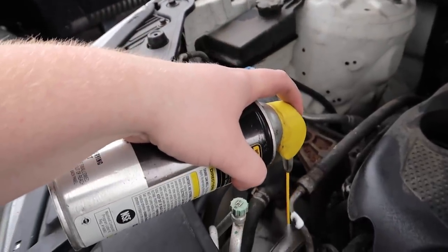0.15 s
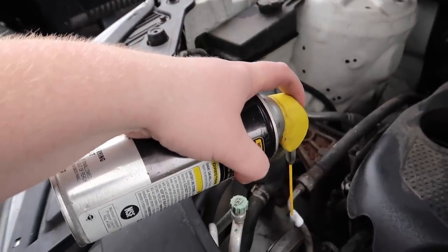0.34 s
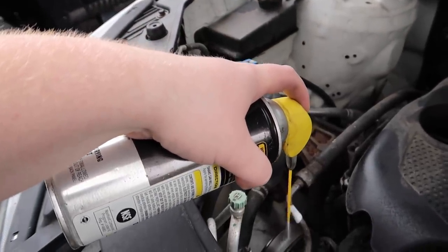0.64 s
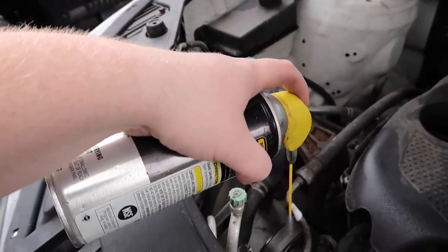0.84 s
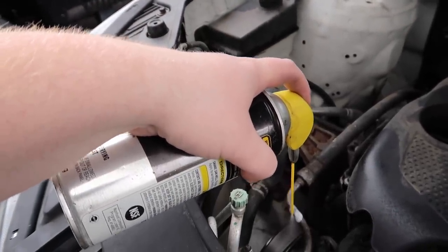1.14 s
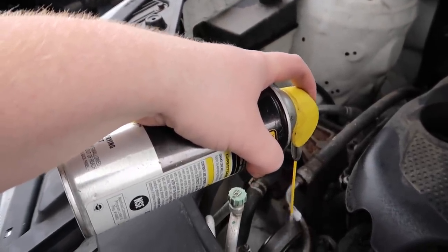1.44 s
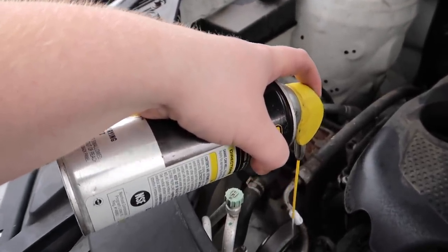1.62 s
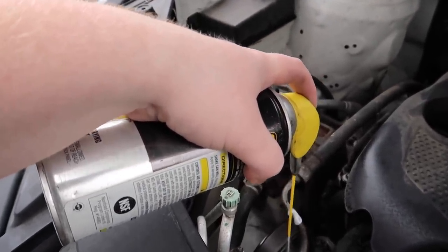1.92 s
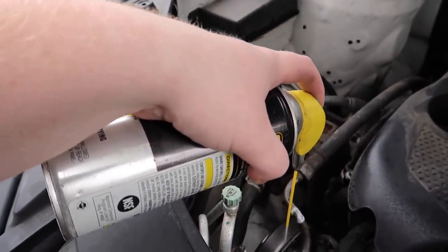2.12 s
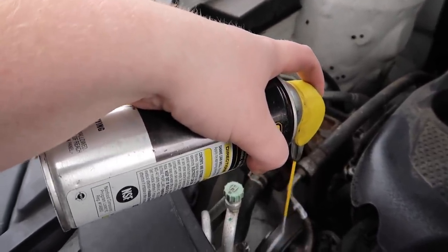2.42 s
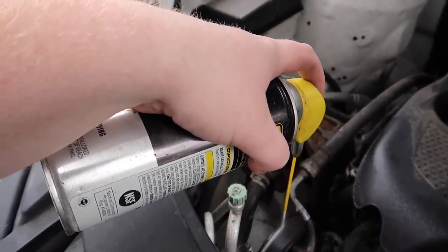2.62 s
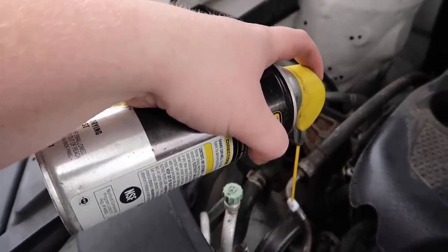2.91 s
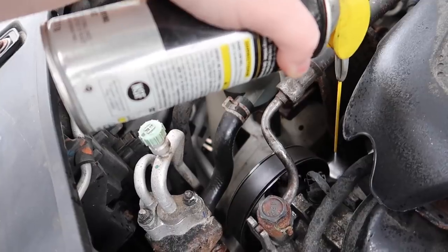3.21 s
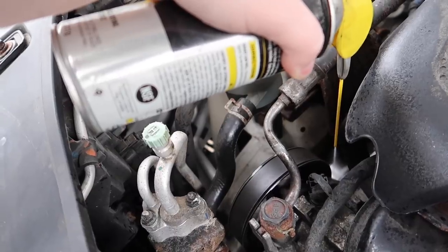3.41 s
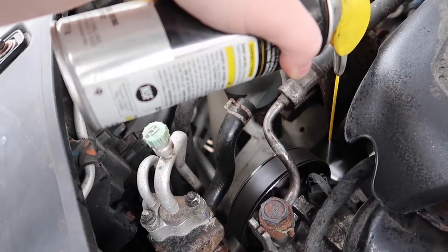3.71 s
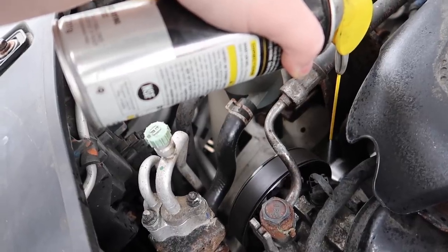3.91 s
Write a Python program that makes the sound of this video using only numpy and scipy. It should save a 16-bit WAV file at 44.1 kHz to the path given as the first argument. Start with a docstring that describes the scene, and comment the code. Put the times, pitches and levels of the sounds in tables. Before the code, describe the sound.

A loud, shrill belt squeal dominates, trilling rapidly with raspy side tones and rubbing rubber hiss. It begins somewhat softer, rises by one second and continues to the cut. An aerosol jet and a dull engine idle sit far below. After three seconds the pitch jumps and the spray and engine edge forward. Close, fairly dry stereo in an engine compartment, with very short bright reflections and low air thumps.

```python
"""A harsh two-tone belt squeal, pulsing twice per pulley turn, under a hissing aerosol can in an idling engine bay.
Belt: two stick-slip tones, split into side tones by the flutter of the span, plus the hiss of rubbing rubber.
Spray: patchy shaped noise, slightly weaker while the belt grips. Engine: throbbing low noise and unsteady orders.
Fan wind puffs on two microphone ports; short treble echoes follow the squeal."""
import sys
import numpy as np
from scipy import signal
from scipy.fft import rfft, irfft, next_fast_len
from scipy.io import wavfile
from scipy.ndimage import uniform_filter1d, map_coordinates

SR = 44100
rng = np.random.default_rng(int(sys.argv[2]) if len(sys.argv) > 2 else 0)


def dump_mix(stems):
    """Bounce the given channels to the path in sys.argv[1] as a 16-bit WAV at rate SR."""
    frames = np.atleast_2d(stems).T  # one column per channel
    limited = np.clip(frames, -1, 1)  # hard clip at full scale
    pcm = np.round(limited * 32767).astype(np.int16)
    wavfile.write(sys.argv[1], SR, pcm)


N = 178649

# Side tones above the low tone: step_flutters, level_db (relative to upper_db)
SIDE_TONES = [(2, -0.5), (3, -2.5), (4, -11.5), (5, -17.5), (6, -14.5), (7, -14), (8, -26), (9, -22)]
# Side tones below the high tone: step_flutters, level_db (relative to the mean dB of both tones)
UNDER_TONES = [(-2, -12.5), (-3, -21.5), (-4, -32)]
# Wet belt's low tone drops flat and climbs back: centre_s, depth_hz
SWOOPS = [(3.715, 110), (3.878, 330), (3.955, 190), (4.03, 170)]
SWOOP_FALL_S, SWOOP_CLIMB_S = 0.01194, 0.026


def belt():
    """Stick-slip tones; the span's flutter is heard itself and steps side tones off them."""
    held, place, dip = slips(glide_s=0.0058, early_s=0.0039)
    low_hz, low_db, high_hz, high_db, flutter_hz, flutter_db, octave_db, upper_db = held
    grip_db = dip(0.011, 0.007)
    late_db = dip(0.015, 0.016, widens=0.2)  # side tones need longer to build up again

    swoop_s, swoop_hz = np.transpose(SWOOPS)
    since_s = np.arange(N) / SR - swoop_s[:, None]
    swoop_width_s = np.where(since_s < 0, SWOOP_FALL_S, SWOOP_CLIMB_S)
    low_hz = low_hz - swoop_hz @ np.exp(-(since_s / swoop_width_s) ** 2)

    # tension builds in a slip, sags in the grip
    tension = 1 + 0.01 * (place - 0.5) + 0.0024 * (grip_db + 1.5) + 0.0025 * wobble(60)
    low, high, flutter = (phase_of(hz * tension) for hz in (low_hz, high_hz, flutter_hz))

    low_level_db = low_db + 0.8 * dip(0.011, 0.006, widens=0) + 1.5
    y = tone(low, low_level_db, rough_db=2.4, blur=0.7, wide=0.33, twin=0.55)
    high_level_db = high_db + 1.3 * dip(0.011, 0.008, widens=0.6) + 1.7
    y += tone(high, high_level_db, rough_db=1.8, blur=0.45, wide=0.25, twin=0.4)

    # the span's own note near 790 Hz steadies the audible flutter
    pull_hz = np.where(flutter_hz < 950, 0.35 * (790 - flutter_hz), 0)
    y += tone(flutter + phase_of(pull_hz), flutter_db + 0.7 * grip_db + 1.2,
              rough_db=2.5, blur=0.45, wide=0.08, twin=0.12)
    y += tone(2 * flutter, octave_db + 0.9 * grip_db - 0.6, rough_db=3, blur=0.4, wide=0.08, twin=0.3)
    for step, db in SIDE_TONES:
        y += tone(low + step * flutter, upper_db + db + 2.5 + 1.8 * late_db,
                  rough_db=3, blur=0.45, wide=0.45, twin=0.35)
    for step, db in UNDER_TONES:
        y += tone(high + step * flutter, (low_db + high_db) / 2 + db + 0.9 * grip_db,
                  rough_db=3, blur=0.45, wide=0.25, twin=0.4)

    # the slip is lopsided: octaves and sum tone
    distortion = ((2 * low, 2 * low_db - 3), (low + high, low_db + high_db), (2 * high, 2 * high_db - 3))
    for phase, db in distortion:
        y += tone(phase, db + 1.5 * grip_db, rough_db=4, blur=1.0, wide=0.45, twin=0.6)

    return y + rub(high_db, upper_db, late_db), late_db


# Pulley turns, two slips each; level is both tones summed:
# start_s, first_level_db, first_low_over_high_db, second_level_db, second_low_over_high_db
PULLEY_TURNS = [(-0.013, -25.5, -5, -27, -3.5), (0.066, -25.5, -10, -25.5, 1.7),
                (0.141, -27.5, -13, -26.9, -14), (0.216, -23.5, -3, -26, -5),
                (0.295, -24.5, -4, -24.5, 1.7), (0.375, -22, -6, -22.5, 1.7), (0.451, -20.5, -6, -22.5, -2),
                (0.523, -22, 0.1, -20.5, 1.6), (0.608, -20, 0, -21.5, -1), (0.682, -19.5, -3, -18.5, -4),
                (0.763, -18, -7, -18.7, 6), (0.837, -18, -9, -19, -7.9), (0.916, -19.5, -3.9, -17.5, -2),
                (0.997, -15.5, -5, -16, -7), (1.069, -16, -8, -20.5, -15), (1.154, -16.5, -3.1, -19, -5),
                (1.231, -17.5, -5, -17.5, 5), (1.304, -17.5, -13, -17, 1), (1.382, -16, -2, -18.5, 3),
                (1.46, -17.5, -8, -17.5, -2.5), (1.533, -18, -11.5, -18.0, 0.9),
                (1.611, -18.5, -16, -17.5, -4.7), (1.695, -17, -5, -16.5, -9),
                (1.767, -16.5, -15, -16.5, 5), (1.848, -16.7, -6, -18, -3), (1.921, -15.5, -3, -17.5, 5.5),
                (2.001, -16.5, -3, -16.5, 7.9), (2.076, -20, -3.6, -17, 1.5),
                (2.157, -15.2, -2.2, -16.2, 8.5), (2.235, -20, 0.5, -16.9, 6), (2.311, -18, -3, -17.5, 1),
                (2.385, -19.5, -2.5, -19, 2.8), (2.469, -19, -3, -19, 5), (2.545, -20.3, -3, -21, 0),
                (2.613, -16, 3, -19, 1), (2.7, -20, -3.3, -19.5, 9), (2.777, -20.5, 0.9, -19, 9),
                (2.85, -20, 1.1, -18, 8), (2.929, -18, 3, -18.5, 7), (3.009, -21, 3.6, -24.4, 2),
                (3.079, -20.5, -2.5, -19, 1), (3.156, -20.0, 6, -22, -5), (3.233, -17.5, 8, -22, -4),
                (3.315, -16, 1, -17.5, -3.9), (3.391, -18.4, -2.3, -18.5, -6.4),
                (3.472, -20.9, -3, -16, -7), (3.554, -18.5, 2, -16.6, -4), (3.626, -20, -1.6, -17, 0.8),
                (3.704, -16.5, 12.6, -17.5, 8.6), (3.788, -17.5, 7, -15, -1.5),
                (3.865, -18.1, 19.5, -18, 7.0), (3.947, -15.5, 33, -20.5, 10.5), (4.012, -17, 27, -18, 20)]
# start_s, second_slip_delay_s
SECOND_SLIP = [(0, .04), (3.65, .04), (3.7, .028), (4.05, 0.032)]
# Sags as the spray wets the belt: time_s, first_slip_hz, second_slip_hz
LOW_TONE = [(0, 5075, 5255), (2.0, 5076, 5236), (3.1, 5063, 5200), (3.25, 4975, 5150), (3.4, 4993, 5114),
            (3.55, 5070, 5080), (4.05, 5053, 5086)]
# Gain on flutter and side tones: time_s, gain_db
FLUTTER_STRENGTH = [(0, 2), (.9, -1), (1.6, 0.5), (2.1, -1), (2.6, 2), (3.2, 1.5), (3.6, 1.5), (4.05, 1)]
# Both tones lock to multiples 7 and 8 of a lower flutter: slip_s, flutter_hz, octave_db
LOCKS = [(0.263, 730, -37), (0.49, 738, -41), (0.681, 718, -31.5), (0.716, 732, -34), (0.917, 734, -33.5),
         (0.95, 732.4, -32.5), (0.997, 733, -36), (1.155, 726, -37.5), (1.382, 706, -28),
         (1.459, 727, -37.5), (1.659, 713.5, -30.5), (1.694, 730, -32.5), (1.878, 732, -32.5),
         (1.921, 726, -36), (2.157, 716, -28.5), (2.421, 737.4, -39), (2.615, 712, -32.5),
         (3.316, 715, -40)]
# Wet belt jumps to a faster flutter:
# slip_s, low_hz, high_hz, flutter_hz, low_db, high_db, flutter_db, upper_side_tones_db
JUMPS = [(3.011, 5167, 5685, 1146, -21.5, -24, -38, -38), (3.042, 4790, 6070, 1288, -28, -28, -39.5, -27),
         (3.079, 5300, 5840, 1316, -23.5, -23, -38, -40), (3.156, 5090, 6180, 1137, -22, -28, -37, -41),
         (3.202, 4785, 5850, 1282, -31, -22.5, -32, -29.5),
         (3.282, 4704, 5937, 1292, -29, -22.5, -32.5, -36), (3.702, 5050, 6310, 1155, -18, -38, -43, -44),
         (3.732, 5100, 6345, 1122, -19, -24, -36, -34.5), (3.785, 5119, 6319, 1146, -19, -40, -49, -48.5),
         (3.901, 5140, 6340, 1266, -20, -27, -41.5, -35), (3.976, 5150, 6287, 1265, -19, -33, -33.5, -40)]
# Dip before each slip: time_s, before_first_db, before_second_db
GRIP_DIP = [(0, -6.5, -3), (2.0, -7, -4), (2.5, -6, -2.5), (3.2, -11.5, -2), (3.6, -13, -3.5),
            (4.05, -7, -2)]
# Slips whose opening dip is unusually deep or shallow: slip_s, dip_db
ODD_GRIPS = [(.681, -9), (.762, -10), (1.154, -13), (1.305, -9), (1.382, -9), (1.611, -12), (2.777, -11),
             (2.85, -10), (2.929, -3), (3.009, -4), (3.315, -14)]
# pairs: first slip, second slip
HIGH_TONE_HZ, HIGH_SAG_HZ, FLUTTER_HZ = 5888, (35.03, 0), (767.5, 797.6)
FLUTTER_DB, OCTAVE_DB, UPPER_DB = (-21.5, -17.5), (-26, -23.5), (-12.5, -10)  # relative to the slip's level
HIGH_LEADS_DB, LOW_LEADS_DB = -2.5, 1.5  # beyond these the weaker tone locks one flutter step from the stronger
SOLO_DB, SOLO_FADE_DB_PER_DB = 8.5, 1.68  # low tone this far ahead: flutter and side tones fade
SCATTER_HZ, SCATTER_DB = 13, 2  # from slip to slip


def slip_rows():
    """One row per slip: start, nominal pitches and levels of the tones and flutter, grip dip before it."""
    turn_s, *cols = np.transpose(PULLEY_TURNS)
    second_s = turn_s + np.interp(turn_s, *np.transpose(SECOND_SLIP))
    start_s = np.ravel([turn_s, second_s], "F")
    level_db, lead_db = np.ravel(cols[0::2], "F"), np.ravel(cols[1::2], "F")
    chance = rng.standard_normal((len(start_s), 6)).T

    def each(pair):
        return np.tile(pair, len(turn_s))

    def by_slip(s, first, second):
        return np.where(each((True, False)), np.interp(start_s, s, first), np.interp(start_s, s, second))

    def nearest(s):
        return np.argmin(abs(start_s - s))

    flutter_hz = each(FLUTTER_HZ) + SCATTER_HZ * chance[0]
    own_low_hz = by_slip(*np.transpose(LOW_TONE)) + SCATTER_HZ * chance[1]
    own_high_hz = HIGH_TONE_HZ - each(HIGH_SAG_HZ) + SCATTER_HZ * chance[2]
    low_hz = np.where(lead_db < HIGH_LEADS_DB, own_high_hz - flutter_hz, own_low_hz)
    high_hz = np.where(lead_db > LOW_LEADS_DB, own_low_hz + flutter_hz, own_high_hz)

    high_db = level_db - 10 * np.log10(1 + amp(2 * lead_db))
    low_db = high_db + lead_db
    solo_fade_db = SOLO_FADE_DB_PER_DB * np.maximum(0, lead_db - SOLO_DB)
    pair_db = level_db + np.interp(start_s, *np.transpose(FLUTTER_STRENGTH)) - solo_fade_db
    flutter_db, octave_db, upper_db = (pair_db + each(db) + SCATTER_DB * c
                                       for db, c in zip((FLUTTER_DB, OCTAVE_DB, UPPER_DB), chance[3:]))

    for s, hz, db in LOCKS:
        k = nearest(s)
        flutter_hz[k], low_hz[k], high_hz[k], octave_db[k] = hz, 7 * hz, 8 * hz, db
    jump_cols = (low_hz, high_hz, flutter_hz, low_db, high_db, flutter_db, upper_db)
    for s, *row in JUMPS:
        k = nearest(s)
        for col, value in zip(jump_cols, row):
            col[k] = value

    depth_db = by_slip(*np.transpose(GRIP_DIP))
    for s, db in ODD_GRIPS:
        depth_db[nearest(s)] = db
    return start_s, low_hz, low_db, high_hz, high_db, flutter_hz, flutter_db, octave_db, upper_db, depth_db


USUAL_DIP_DB, DIP_WIDENS = -6, 0.5  # a deeper dip lasts longer: power of depth over the usual


def slips(glide_s, early_s):
    """Per sample: columns of the slip in progress, place inside it (0-1), grip dip (dB) as a function."""
    t = np.arange(N) / SR
    start_s, *cols, depth_db = slip_rows()
    edges_s = np.append(start_s, 2 * start_s[-1] - start_s[-2])
    k = np.clip(np.searchsorted(start_s - early_s, t, "right") - 1, 0, len(start_s) - 1)
    place = (t + early_s - edges_s[k]) / (edges_s[k + 1] - edges_s[k])
    nearest = np.minimum(k + (place > 0.6), len(start_s) - 1)
    since_s = t - start_s[nearest]
    longer = np.maximum(1, depth_db[nearest] / USUAL_DIP_DB)

    def dip(fall_s, rise_s, widens=DIP_WIDENS):
        width_s = longer ** widens * np.where(since_s < 0, fall_s, rise_s)
        return depth_db[nearest] * np.exp(-(since_s / width_s) ** 2)

    glide = max(1, int(glide_s * SR))
    return [uniform_filter1d(c[k], glide) for c in cols], place, dip


def tone(phase, db, rough_db, blur, wide, twin):
    """A partial whose size and phase shiver; a neighbouring rib slips slightly off pitch and beats with it."""
    side = np.array([[1], [-1]])
    shiver = blur * wobble(160) + wide * side * wobble(24.984)
    offset = phase_of(75 * wobble(22))
    neighbour = np.sin(phase + offset - shiver + rng.uniform(0, 2 * np.pi))
    pair = np.sin(phase + shiver) + twin * neighbour
    return np.sqrt(2 / (1 + twin ** 2)) * amp(db + rough_db * wobble(110)) * pair


# Source levels before each function's offset: time_s, spray_db, engine_db, rub_db
BAY_LEVELS = [(0.0, -45.5, -48.5, -43.5), (0.99, -37, -40.5, -34.5), (2.2, -38, -41, -34.5),
              (2.35, -37, -39, -33.5), (2.7, -38, -42, -36.5), (3.0, -35.5, -38.5, -34.5),
              (3.29, -34, -34.5, -30.5), (3.41, -36, -38.5, -35), (4.05, -35, -36, -39.5)]
# Rub noise, coloured by the pulley's resonances: freq_hz, relative_db_per_hz
RUB_SPECTRUM = [(3300, -24.5), (4300, -1), (4620, -3.5), (5130, 9.5), (5500, 7.5), (5880, 10.5), (6250, 3),
                (6720, 10), (7100, -3), (7500, 8), (7950, -0.5), (8400, -3.5), (12600, 0), (13100, -34),
                (13500, -31)]


def rub(high_db, upper_db, late_db):
    """Rubber hisses while it slides, following the squeal's level."""
    effort_db = 0.27 * high_db + 0.11 * upper_db + 0.71 * late_db
    effort_db = effort_db - uniform_filter1d(effort_db, SR // 4)
    level_db = curves(BAY_LEVELS)[2] + 8 + effort_db + 1.4 * wobble(70)
    return amp(level_db) * rush(RUB_SPECTRUM, patchy_db=3.0)


def bay_echo(x, t60_s):
    """Short echoes between block, hoses and bonnet, as decaying noise; mostly the treble scatters."""
    t = np.arange(SR // 8) / SR
    tail = rng.standard_normal((2, len(t))) * amp(-60 * t / t60_s)
    wet = signal.fftconvolve(x, tail / np.linalg.norm(tail[0]), axes=1)[:, :N]
    return filtered(wet, lambda hz: amp(along([(1500, -11), (4000, 1.5)], hz)))


# Jet noise: freq_hz, relative_db_per_hz
SPRAY_SPECTRUM = [(500, -22), (900, -3), (1500, -0.5), (2200, -1), (2800, -4), (3500, -2), (4600, -6.5),
                  (8000, -6), (13500, -15)]
SPATTER_DB_PER_GRIP_DB = 0.3


def spray(grip_db):
    """The jet hisses out of the straw and spatters on the belt, less while the belt grips."""
    flicker_db = 0.82 * wobble(12) + 1.38 * wobble(150)
    level_db = curves(BAY_LEVELS)[0] + 6 + SPATTER_DB_PER_GRIP_DB * grip_db + flicker_db
    return amp(level_db) * rush(SPRAY_SPECTRUM, patchy_db=2.5)


# Engine noise: freq_hz, relative_db_per_hz
DRONE_SPECTRUM = [(88, -30), (150, -8.5), (199, -4.5), (231, -14.5), (254, -1), (394, 0.5), (437, -2.5),
                  (631, -9), (720, -9), (940, -7), (1580, -120)]
# Engine and fan orders: freq_hz, level_db (relative to 40 dB over the engine level)
ORDERS = [(91.5, -47.5), (263.8, -48.5), (468.3, -50), (527.6, -50.5)]


def engine():
    """A noise drone throbbing with the firings, and a few unsteady orders."""
    level_db, t = curves(BAY_LEVELS)[1], np.arange(N) / SR
    throb = 1 + 0.066 * np.cos(2 * np.pi * 46 * t + 0.5 * wobble(3.1))
    orders = sum(amp(db + 4 * wobble(12)) * np.sin(2 * np.pi * hz * t + 1.4 * wobble(18))
                 for hz, db in ORDERS)
    return amp(level_db) * (throb * rush(DRONE_SPECTRUM, patchy_db=1.5) + amp(40) * orders)


# Wind noise: freq_hz, relative_db_per_hz
PUFF_SPECTRUM = [(13, -40), (25, -3), (45, 0), (97, 2), (236, -11), (274, -6.5), (350, -21), (460, -45),
                 (770, -120)]
# Gaussian puffs: centre_s, peak_db, half_length_s (to 1/e)
PUFFS = [(0.328, -44, .03), (.58, -43.5, 0.089), (.69, -29.5, 0.023), (0.778, -39, 0.035),
         (.94, -30.5, 0.019), (1.01, -30, 0.023), (1.058, -34, .015), (1.1, -40, 0.038), (1.3, -43, 0.23),
         (2.11, -43, .06), (2.88, -40, 0.037), (3.069, -37, 0.041), (3.152, -35, 0.026),
         (3.293, -39, 0.052), (3.447, -35.5, 0.027), (3.589, -36.5, 0.039), (3.71, -40, 0.049),
         (3.89, -34, 0.048), (4.019, -37, 0.022)]
# Air between the puffs: time_s, level_db
CALM = [(0, -56), (.25, -54), (.5, -48.5), (2.0, -47.5), (4.05, -46)]


def wind():
    """Low puffs of fan air on the ports."""
    t = np.arange(N) / SR
    puffs = sum(amp(db) * np.exp(-((t - s) / half_s) ** 2) for s, db, half_s in PUFFS)
    strength = amp(curves(CALM)[0]) + puffs
    lumps = amp(1.5 * wobble(17) + 0.3 * np.array([wobble(24), wobble(16)]))
    return strength * unit(lumps * rush(PUFF_SPECTRUM, patchy_db=1.0))


# Left-right likeness of noise: freq_hz, correlation
ALIKE = [(30, .98), (60, .94), (120, .8), (180, .68), (260, .95), (1300, .955), (2800, .86), (6000, .74),
         (13000, .55)]


def rush(spectrum, patchy_db):
    """Stereo noise of rms 1 with time-frequency patches of random gain."""
    z = signal.stft(rng.standard_normal((2, N)), nperseg=512)[2]
    field = rng.standard_normal(z.shape[1:])
    field = uniform_filter1d(uniform_filter1d(field, 6, 0), 8, 1)
    pair = signal.istft(z * amp(patchy_db * unit(field)), nperseg=512)[1][:, :N]

    def mid_side(hz):
        turn = np.arccos(np.clip(along(ALIKE, hz), -1, 1)) / 2
        colour = amp(along(spectrum, hz)) * (hz < spectrum[-1][0])
        return colour * [np.cos(turn), np.sin(turn)]

    mid, side = filtered(pair, mid_side)
    return unit(np.array([mid + side, mid - side]))


def amp(db):
    """Decibels to amplitude."""
    return 10 ** (np.asarray(db) / 20)


def unit(x):
    """Scale to rms 1."""
    return x / np.sqrt(np.mean(x ** 2) + 1e-20)


def phase_of(hz):
    """Phase in radians of a varying frequency."""
    return 2 * np.pi * np.cumsum(hz) / SR


def along(points, hz):
    """Interpolate (Hz, value) points on a log axis."""
    f, v = np.transpose(points)
    return np.interp(np.log(hz + 1), np.log(f + 1), v)


def curves(rows):
    """One value per sample for each column after the time."""
    s, *cols = np.transpose(rows)
    return [np.interp(np.arange(N) / SR, s, c) for c in cols]


def wobble(rate_hz):
    """A smooth random curve, rate_hz knots a second."""
    knots = rng.standard_normal(int(N * rate_hz / SR) + 4)
    return map_coordinates(knots, [np.arange(N) * rate_hz / SR])


def filtered(x, response):
    """x filtered by a complex response of frequency."""
    m = next_fast_len(N + SR // 2)
    return irfft(rfft(x, m) * response(np.fft.rfftfreq(m, 1 / SR)), m)[..., :N]


def scene():
    """Squeal and its echoes, spray, engine, wind."""
    squeal, grip_db = belt()
    echo = amp(-12.5) * bay_echo(squeal, t60_s=0.072)
    return squeal + echo + spray(grip_db) + engine() + wind()


# Left port ahead of right: freq_hz, lead_rad
PORT_LEAD = [(2500, 0), (4400, -.2), (5900, -.6), (8400, -1.3), (11400, -2.2), (13000, -2.8)]
TOP_HZ = 13500


def record(dry):
    """Spaced ports: treble arrives out of step, levels differ slightly; band-limited at TOP_HZ."""
    side = np.array([[1], [-1]])
    tilt_db = [(50, 0.72), (150, 0.52), (400, -0.46), (8000, -0.17)]  # (Hz, + left / - right)

    def ports(hz):
        lead = np.exp(0.5j * side * along(PORT_LEAD, hz))
        return lead * amp(side * along(tilt_db, hz)) * (hz < TOP_HZ)

    return filtered(dry, ports)


dry = scene()
out = record(dry)
dump_mix(out)
```